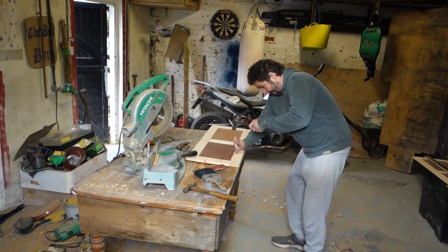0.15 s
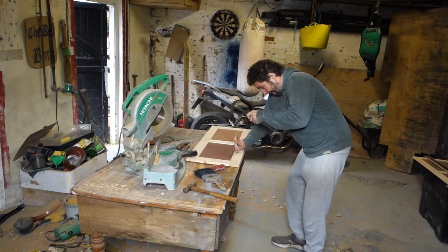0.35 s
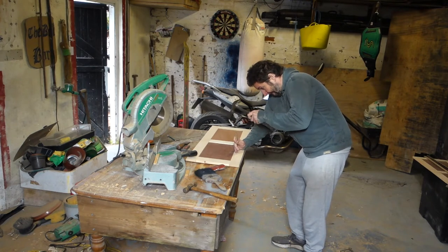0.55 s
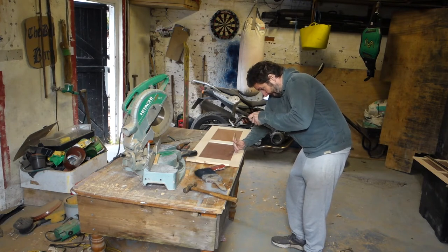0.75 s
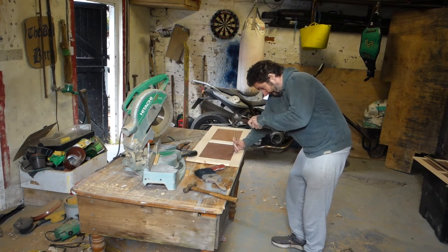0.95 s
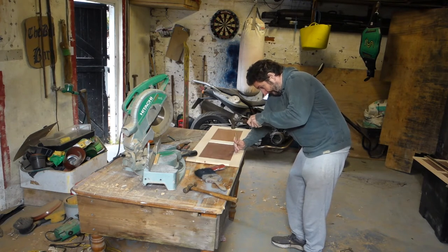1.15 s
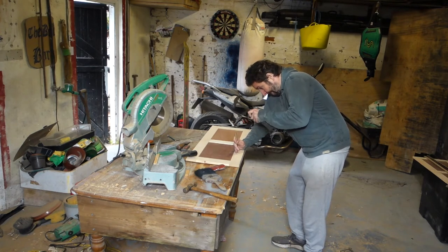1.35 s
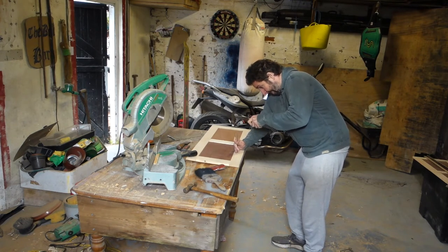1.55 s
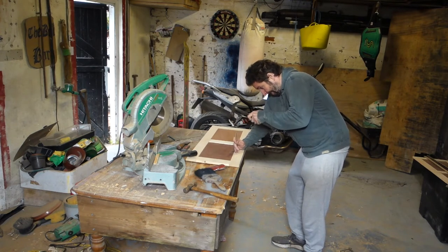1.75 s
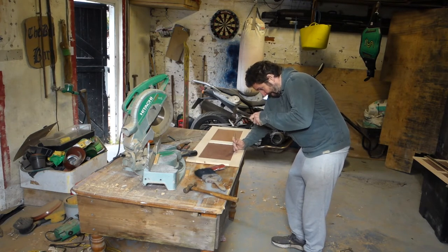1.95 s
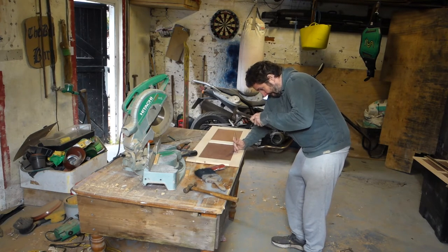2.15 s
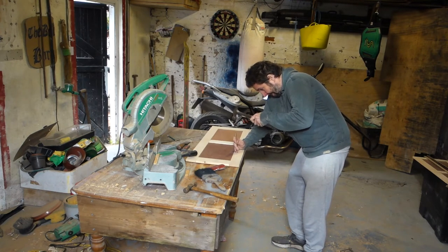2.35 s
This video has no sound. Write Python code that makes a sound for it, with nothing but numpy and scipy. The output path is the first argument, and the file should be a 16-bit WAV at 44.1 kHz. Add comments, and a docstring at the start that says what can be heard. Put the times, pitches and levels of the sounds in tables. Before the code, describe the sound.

Three hammer blows drive a nail punch into a wooden door on a workbench, the first alone, the next two in quick succession. Each gives a steel tick, a knock and a low boom that reverberates briefly around the garage.

```python
"""A hammer strikes a steel nail punch three times, sinking a nail into a wooden door on a garage bench.
Each blow is a steel tick, a knock of the boards and a low boom, all filling the hard-walled room.
Loose metal rings on faintly, and the punch scrapes softly as it is seated. Tick and knock are bursts
of coloured noise; the boom is a cluster of dying sines. A limiter ducks at each blow and recovers
as the room dies away, which stretches the knock into a short roar."""
import sys
import numpy as np
from scipy import signal
from scipy.fft import rfft, irfft, next_fast_len
from scipy.io import wavfile
from scipy.ndimage import uniform_filter1d

SR = 44100
rng = np.random.default_rng(int(sys.argv[2]) if len(sys.argv) > 2 else 0)


def dump(signal):
    """Clip the signal to [-1, 1] and save it as 16-bit WAV at the path in sys.argv[1]."""
    limited = np.clip(np.atleast_2d(signal).T, -1, 1)
    pcm = np.round(limited * 32767).astype(np.int16)
    wavfile.write(sys.argv[1], SR, pcm)


N = 105840
LEAD = int(0.5 * SR)   # pre-roll for a blow that lands before the start
SIZE = next_fast_len(N + LEAD)
TIME = (np.arange(SIZE) - LEAD) / SR
HZ = np.maximum(np.arange(SIZE // 2 + 1) * SR / SIZE, 1)


def from_db(db):
    """Decibels to gain."""
    return 10 ** (np.asarray(db) / 20)


def curve(points, column=1):
    """One column of a table, drawn across the spectrum on a log-frequency axis."""
    table = np.array(points)
    return np.interp(np.log(HZ), np.log(table[:, 0]), table[:, column])


def bell(x, centre, width):
    """A bell curve of height 1; the width spans two standard deviations."""
    return np.exp(-2 * ((x - centre) / width) ** 2)


def peaks_db(resonances):
    """Resonances as an EQ curve of bell-shaped boosts and cuts."""
    return sum(db * bell(HZ, hz, width) for hz, width, db in resonances)


def attack(age, build_s):
    """Exponential rise from age zero."""
    return 1 - np.exp(-np.maximum(age, 0) / build_s)


def decay(age, t60):
    """Exponential fall from age zero, silent before."""
    return (age >= 0) * np.exp(-np.log(1000) * np.maximum(age, 0) / t60)


def stereo_noise(colour_db):
    """Spectrum of diffuse stereo noise, rms about 1: centred lows, wide highs."""
    # stereo image: (frequency [Hz], left-right correlation [0..1], left minus right [dB])
    image = [(101, 0.99, 1), (250, 1, .5), (500, 0.92, 0.5), (1000, 0.78, 1.8), (2181, .78, 1.6),
             (4000, .05, -4), (8500, .3, -2.3)]
    mid, side = rfft(rng.standard_normal((2, SIZE)))
    alike = np.clip(curve(image), -.99, .998)
    sign = np.array([[1], [-1]])
    pair = np.sqrt((1 + alike) / 2) * mid + sign * np.sqrt((1 - alike) / 2) * side
    balance = from_db(sign * curve(image, column=2) / 2)
    gain = from_db(colour_db)
    return pair * balance * gain / np.sqrt(np.mean(gain ** 2))


def struck_modes(modes, age):
    """Dying sines, each a little louder or softer on every blow."""
    scatter_db = 2.5 * rng.standard_normal(len(modes))
    return sum(from_db(db + extra) * decay(age, t60) * np.sin(2 * np.pi * hz * age)
               for (hz, db, t60), extra in zip(modes, scatter_db))


def room_tone():
    """The quiet, dark air of the garage."""
    # spectrum of the air: (frequency [Hz], relative level [dB])
    air_eq = [(15, -40.5), (25, -15), (115, 0), (187, -23), (372, -10.5), (545, -16.5), (685, -12.5),
              (1200, -26.5), (1670, -30), (11000, -37), (14300, -60), (22000, -120)]
    return from_db(-65.5) * irfft(stereo_noise(curve(air_eq)), SIZE)


def punch_scrape():
    """The punch's tip rubs faintly as it is seated on the nail head."""
    # spectrum of the rub: (frequency [Hz], relative level [dB])
    scrape_eq = [(400, -9), (520, 5.5), (750, -11), (1100, -4), (1450, -10.5), (1800, -8), (2250, -11.5),
                 (2580, -2.5), (2950, -23.5), (5000, -20.5), (7000, -26.5), (11000, -29)]
    rub = irfft(stereo_noise(curve(scrape_eq)), SIZE)
    return from_db(-51.5) * rub * bell(TIME, centre=0.045, width=0.16)


def punch_colour(steel_db, ring_db, top_hz):
    """The steel's EQ in dB: a treble shelf and broad, damped rings."""
    # lower rings of punch and hammer head: (frequency [Hz], width [Hz])
    lower_rings = [(2220, 520), (3900, 220), (4400, 79), (5480, 890)]
    shelf_hz, top_width_hz = 1700, 520
    shelf = steel_db * HZ ** 2 / (HZ ** 2 + shelf_hz ** 2)
    top_ring = (top_hz, top_width_hz, 9 + 0.41 * ring_db)
    return shelf + peaks_db([(hz, width, ring_db) for hz, width in lower_rings] + [top_ring])


def steel_tick(age, colour_db):
    """The hammer face meets the punch, whose ring the fingers damp at once."""
    # spectrum of steel on steel: (frequency [Hz], relative level [dB])
    tick_eq = [(60, -31.5), (300, 4), (2500, -1.5), (4000, -12), (7000, -10), (10000, -13.5), (16000, -1.5)]
    crack = irfft(stereo_noise(curve(tick_eq)) * from_db(colour_db), SIZE)
    return from_db(6.5) * crack * attack(age, build_s=0.003) * decay(age, t60=0.023)


def wood_colour(bite_db, hollow_db):
    """The wood's EQ in dB: the bite of the nail giving way and the hollow of the boards."""
    bite_hz, hollow_hz = 1380, 406
    octave = np.log2(HZ)
    bite = bite_db * bell(octave, np.log2(bite_hz), width=2)
    hollow = hollow_db * bell(octave, np.log2(hollow_hz), width=2)
    return bite + hollow


def board_knock(age, colour_db):
    """Boards and punch sound through dense reflections; the treble comes and dies first."""
    # spectrum of the knock in the room: (frequency [Hz], relative level [dB])
    knock_eq = [(30, -24), (50, -27.5), (80, -8), (130, 0), (230, -1), (400, -1), (800, -0.5), (1300, -3),
                (1800, -5.5), (2300, -9.5), (2800, -10.5), (3500, -20), (4800, -25), (7500, -29.5),
                (11000, -34.5), (16000, -30.5)]
    # resonances of boards and punch: (frequency [Hz], width [Hz], boost [dB])
    resonances = [(219, 26, 4.5), (278, 60, 3), (351, 71, 2), (395.8, 5.3, 7), (407, 6.3, 3.5),
                  (458, 48, 0.5), (531.2, 14, 9.5), (660, 16, 2), (688, 16, -2.5), (765, 37, 4),
                  (927.4, 37, 4), (1040, 48, 1.5), (1143, 14, -2), (1305, 13, 3), (1550, 20, 1),
                  (1690, 9.8, 9.5), (1756, 94, -3), (1740, 13, -2), (2586, 21, 8.5), (3330, 32, 3.5),
                  (6000, 110, 0.5), (6660, 98, 3), (7900, 120, 3.5)]
    # the garage's reverb by band: (centre [Hz], t60 [s], build-up [s])
    reverb = [(50, 0.55, .04), (120, 0.39, .04), (250, 0.34, 0.036), (580, 0.35, 0.013), (1470, 0.38, 0.01),
              (2740, 0.32, 0.0015), (5000, 0.3, .0015), (9700, 0.22, .0015)]
    spectrum = stereo_noise(curve(knock_eq) + peaks_db(resonances)) * from_db(colour_db)
    centres, t60s, builds = np.transpose(reverb)
    out = 0
    for solo, t60, build_s in zip(np.eye(len(centres)), t60s, builds):
        crossover = np.interp(np.log(HZ), np.log(centres), solo)
        band = irfft(spectrum * crossover, SIZE)
        out = out + band * attack(age, build_s) * decay(age, t60)
    return from_db(4.5) * out


def door_boom(age):
    """Door and bench take up the blow more slowly; their close modes beat."""
    # lowest modes of door and bench: (frequency [Hz], level [dB], t60 [s])
    door_modes = [(79, -24.5, 0.75), (90.7, -19, 0.49), (101.2, -13, 0.67), (111.1, -23, 0.79),
                  (121.1, -19.5, .62), (147.3, -19.5, 0.55), (222.6, -17.5, .5), (319.4, -25.5, 0.11),
                  (544.5, -20, .48)]
    return struck_modes(door_modes, age) * attack(age, build_s=0.023)


def after_ring(age):
    """Tools and sheet metal around the bench ring on as a wash far below the blow."""
    # spectrum of the wash: (frequency [Hz], relative level [dB])
    wash_eq = [(50, -3), (105, 8), (180, 7), (400, -2), (900, -4.5), (1300, -19), (1750, -8.5), (2150, -16),
               (2600, -20), (3200, -25), (10000, -35.5)]
    # resonances of the loose metal: (frequency [Hz], width [Hz], boost [dB])
    resonances = [(470, 73, 1.5), (810, 20, 9.5), (960, 33, 12), (1650, 110, 8), (2450, 250, 10)]
    wash = irfft(stereo_noise(curve(wash_eq) + peaks_db(resonances)), SIZE)
    return from_db(-51.5) * wash * decay(age, t60=1.75)


def singing_metal(age):
    """Single pieces of metal sing on as thin, pure tones."""
    # modes of the pieces: (frequency [Hz], level [dB], t60 [s])
    metal_modes = [(374, -61, 3.5), (700, -66.5, 2), (2635, -53, 1.1), (4350, -35, 0.4)]
    return struck_modes(metal_modes, age)


def scene():
    """The punch is seated and struck, over the room tone of the garage."""
    # hammer blows; the first lands before the start, so only its tail is heard:
    # (time [s], force [dB], nail bite [dB], steel shelf [dB], tick [dB], punch ring [dB],
    #  top ring [Hz], boom [dB], board hollow [dB], after-ring [dB], singing metal [dB])
    blows = [(-0.33, 2.5, -5.5, -5, 0, 10, 9800, 0.5, 2.5, -1, -4),
             (0.1258, 2, -1.5, -1, -3.5, 2, 9780, 1, 2.5, 6, -5.5),
             (1.04, -8.5, -4.5, -5, 9, 8.5, 9810, 1.5, 3.5, 3.5, -8),
             (1.472, 4.5, -1, 1.5, 2.5, 1.5, 9550, -4.5, 2.5, -2, -4.5)]
    out = room_tone() + punch_scrape()
    for (start_s, force_db, bite_db, steel_db, tick_db, ring_db,
         top_hz, boom_db, hollow_db, after_db, metal_db) in blows:
        age = TIME - start_s
        punch_db = punch_colour(steel_db, ring_db, top_hz)
        tick = from_db(tick_db) * steel_tick(age, punch_db)
        knock = board_knock(age, punch_db + wood_colour(bite_db, hollow_db))
        boom = from_db(boom_db) * door_boom(age)
        wash = from_db(after_db) * after_ring(age)
        metal = from_db(metal_db) * singing_metal(age)
        out = out + from_db(force_db) * (tick + knock + boom + wash + metal)
    return out[:, LEAD:LEAD + N]


def limiter(dry):
    """A look-ahead limiter, keenest on treble; it over-ducks, so a hard blow swells as it recovers."""
    threshold_db, release_db_per_s, detect_s = -12.5, 199.5, 0.0043
    treble_hz, treble_weight, duck_db_per_db = 3000, 3.07, 1.0668
    treble = signal.sosfilt(signal.butter(2, treble_hz, "high", fs=SR, output="sos"), dry)
    sidechain = np.mean(dry ** 2 + (treble_weight * treble) ** 2, axis=0)
    power = uniform_filter1d(sidechain, int(detect_s * SR))
    level_db = 10 * np.log10(np.maximum(power, 1e-12))
    target_db = duck_db_per_db * np.maximum(level_db - threshold_db, 0)
    ramp = release_db_per_s * np.arange(N) / SR
    held_db = np.maximum.accumulate(target_db + ramp) - ramp   # grabs each peak, lets go steadily
    duck_db = uniform_filter1d(held_db, size=64)
    return dry * from_db(-duck_db)


def record(dry):
    """The limiter, then a steep high cut at 11 kHz."""
    high_cut = signal.ellip(10, .5, 70, 11000, fs=SR, output="sos")
    return signal.sosfilt(high_cut, limiter(dry))


dry = scene()
out = record(dry)
dump(out)
```